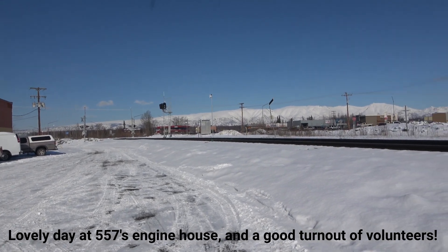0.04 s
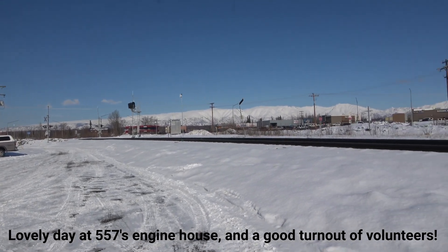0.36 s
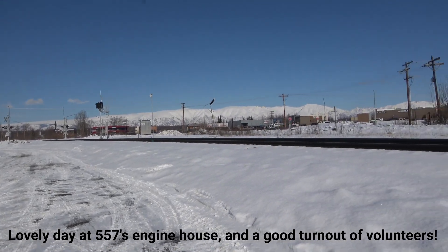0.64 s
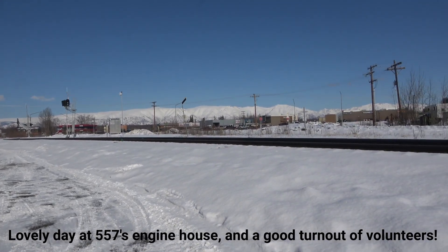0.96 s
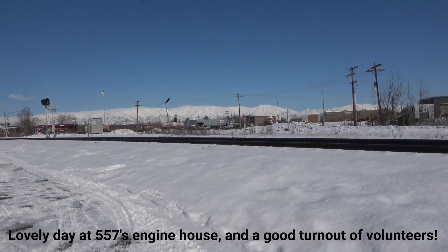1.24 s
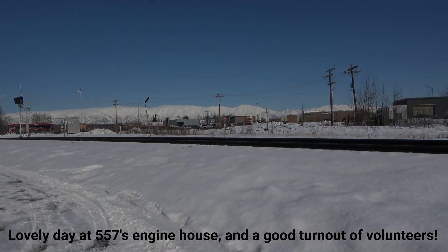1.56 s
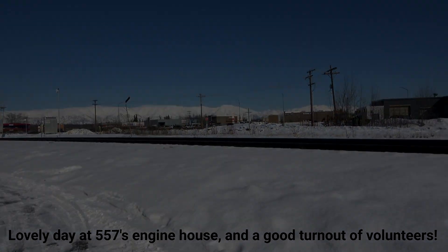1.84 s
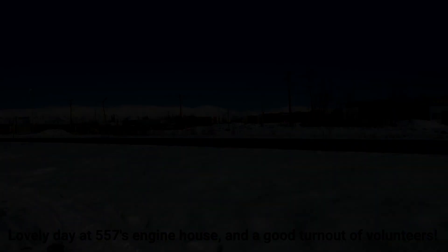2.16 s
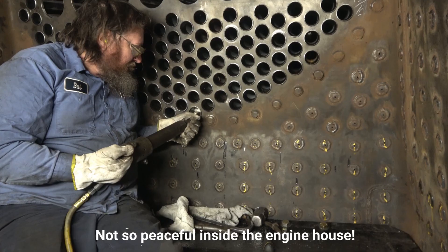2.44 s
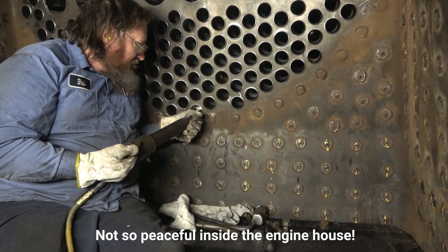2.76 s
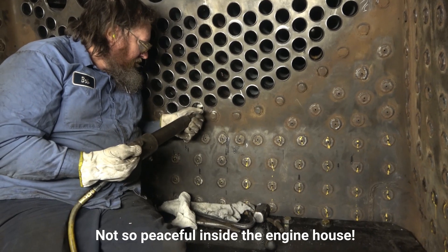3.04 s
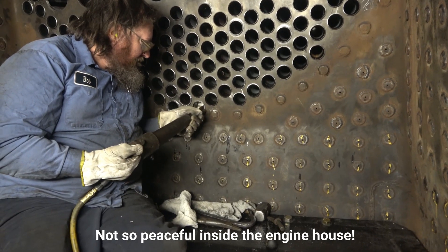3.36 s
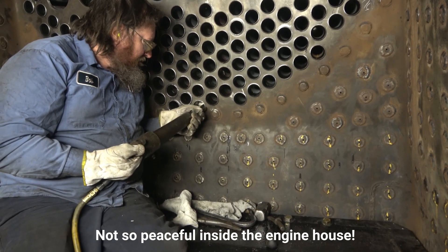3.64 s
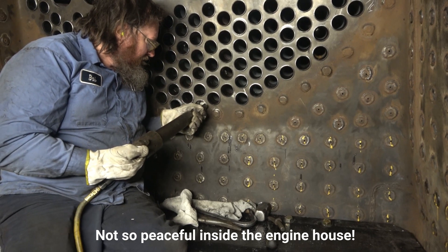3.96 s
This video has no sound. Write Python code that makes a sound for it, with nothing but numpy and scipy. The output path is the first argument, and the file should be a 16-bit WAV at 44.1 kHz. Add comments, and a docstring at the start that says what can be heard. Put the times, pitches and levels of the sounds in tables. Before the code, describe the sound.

An air hammer on steel dominates, after a quiet outdoor opening. Distant traffic hums and hisses over low wind, with a soft bump near 0.2 seconds, fading from 1.5 seconds to near silence. At 2.4 seconds the hammer cuts in, loud and close, about seventeen blows a second. The metal chamber rings in a steady, rasping din until 4 seconds, with a few high pings near the end.

```python
"""Distant traffic, then an air hammer in a firebox.

Far traffic hums and hisses over a low wind rumble, then fades. Cut to the inside of a steel firebox:
an air hammer strikes a boiler tube about 17 times a second. Every blow cracks, rings the tool bit
and feeds the plates and the chamber, whose ringing piles up into a steady din."""
import sys
import numpy as np
from scipy import signal
from scipy.fft import rfft, irfft, next_fast_len
from scipy.io import wavfile
from scipy.ndimage import uniform_filter1d, map_coordinates

SR = 44100
rng = np.random.default_rng(int(sys.argv[2]) if len(sys.argv) > 2 else 0)


def wav_record(signal):
    """Record a signal, one row per channel, as 16-bit PCM in the file named by sys.argv[1]."""
    frames = np.transpose(np.atleast_2d(signal))
    bounded = np.clip(frames, -1, 1)
    # unit amplitude maps onto the largest positive 16-bit level
    quanta = np.round(bounded * 32767).astype(np.int16)
    wavfile.write(sys.argv[1], SR, quanta)


N = 176400
TIME_S = np.arange(N) / SR
CUT_S = 2.396
BLOW_PERIOD_S, BOUNCE_S = 0.057, 0.02


def amp(db):
    return 10 ** (np.asarray(db) / 20)


def unit_rms(x):
    return x / np.sqrt(np.mean(x ** 2) + 1e-20)


def unit_inside(pair):
    """Each signal at rms 1 over the time after the cut."""
    return pair / np.std(pair[:, round(CUT_S * SR):], axis=1, keepdims=True)


def curves(rows):
    """One value per sample for each column after the time."""
    times_s, *columns = np.transpose(rows)
    return [np.interp(TIME_S, times_s, column) for column in columns]


def wobble(rate_hz):
    """Smooth random curve, rate_hz knots a second."""
    knots = rng.standard_normal(int(N * rate_hz / SR) + 4)
    return map_coordinates(knots, [TIME_S * rate_hz])


def filtered(x, response):
    """x through a gain given as a function of Hz."""
    size = next_fast_len(N + SR // 2)
    return irfft(rfft(x, size) * response(np.fft.rfftfreq(size, 1 / SR)), size)[..., :N]


def coloured(x, spectrum):
    """x shaped by (Hz, dB) points."""
    points_hz, db = np.transpose(spectrum)
    return filtered(x, lambda hz: amp(np.interp(np.log(hz + 1), np.log(points_hz + 1), db)))


def rolled_off(pair, edge_hz, db_per_octave):
    """Low-pass with a moving edge."""
    hz, frame_s, bins = signal.stft(pair, SR, nperseg=256)
    octaves = np.log2(np.maximum(hz[:, None] / np.interp(frame_s, TIME_S, edge_hz), 1))
    return signal.istft(bins * amp(-db_per_octave * octaves), SR, nperseg=256)[1][:, :N]


def stereo(pair, side_db):
    """Mid and side to left and right."""
    return pair[0] + amp(side_db) * np.array([pair[1], -pair[1]])


def decay(t60_s):
    return amp(-60 * np.arange(SR) / SR / t60_s)


def ring(drive, responses):
    return signal.fftconvolve(drive[None], responses, axes=1)[:, :N]


def bursts(impulses, t60_s):
    """A noise pair dying away after every impulse."""
    energy = ring(impulses ** 2, decay(t60_s)[None] ** 2)
    return np.sqrt(np.abs(energy)) * rng.standard_normal((2, N))


def rush(spectrum, side_db, flutter_db):
    """Stereo noise with a restless level."""
    noise = coloured(rng.standard_normal((2, N)), spectrum)
    return unit_rms(stereo(noise, side_db)) * amp(flutter_db * wobble(12.52))


# Wind rumble (frequency [Hz], density [dB])
WIND_SPECTRUM = [(11, -31), (20, -1), (81, -0.5), (100, -9), (160, -11), (300, -23), (420, -62)]

def wind():
    """Low, unsteady wind rumble."""
    return amp(-29) * rush(WIND_SPECTRUM, side_db=-18, flutter_db=2)


# Road noise and tyre hiss (frequency [Hz], density [dB])
ROAD_SPECTRUM = [(150, -30), (250, -7.5), (750, -3.5), (1660, -10.5), (2840, -18.5), (4770, -28.5),
                 (6300, -40), (9070, -38.5), (15800, -52.5)]
TYRE_SPECTRUM = [(1000, -10), (2300, 0), (3300, -4.5), (5500, -18), (8000, -26), (11000, -44)]
# Tyre hiss (time [s], level [dB])
TYRE_LEVEL = [(0, -49), (.3, -50), (.5, -45.5), (.8, -47.5), (.95, -55.5), (1.45, -58), (1.75, -47.5)]

def traffic():
    """A far road with swelling tyre hiss."""
    road = amp(-38) * rush(ROAD_SPECTRUM, side_db=-6.5, flutter_db=0.67)
    tyres = amp(curves(TYRE_LEVEL)[0]) * rush(TYRE_SPECTRUM, side_db=-6.5, flutter_db=2.3)
    return road + tyres


# Far engine (time [s], level [dB])
ENGINE_LEVEL = [(0, -36.5), (.5, -36), (.58, -27.5), (.8, -31), (1.05, -32), (1.25, -32.5), (1.48, -35)]

def engine(pitch_hz=83.4, wander=0.0275):
    """A wandering drone with a weak octave."""
    phase = 2 * np.pi * np.cumsum(pitch_hz * (1 + wander * wobble(14.0))) / SR
    drone = unit_rms(np.sin(phase) + amp(-15.5) * np.sin(2 * phase))
    return drone * amp(curves(ENGINE_LEVEL)[0] + 0.91 * wobble(15.9))


def chirp(centre_s=0.033, width_s=0.012, pitch_hz=3480):
    """One faint, far chirp."""
    t = TIME_S - centre_s
    return amp(-46) * np.exp(-(t / width_s) ** 2) * np.sin(2 * np.pi * pitch_hz * t)


# Soft bumps (time [s], level [dB])
BUMPS = [(.24, -17.5), (1.817, -32.5), (3.689, -11.5)]

def bumps(pitch_hz=355, rise_s=0.0016, t60_s=0.022):
    """Dull, quickly damped knocks."""
    onset_s, db = np.transpose(BUMPS)
    age_s = np.maximum(TIME_S - onset_s[:, None], 0)
    envelope = (1 - np.exp(-age_s / rise_s)) * amp(-60 * age_s / t60_s)
    return amp(db) @ (envelope * np.sin(2 * np.pi * pitch_hz * age_s))


# Workshop rumble (time [s], level [dB])
WORKSHOP_LEVEL = [(2.25, -89), (2.38, -82), (2.41, -39), (2.65, -39), (2.76, -44.5), (4, -42)]
# Workshop rumble (frequency [Hz], density [dB])
WORKSHOP_SPECTRUM = [(18, -25), (45, 3.5), (70, -12), (120, -1), (190, -6.5), (400, -39)]

def workshop():
    """Low room rumble, rising at the cut."""
    return amp(curves(WORKSHOP_LEVEL)[0]) * rush(WORKSHOP_SPECTRUM, side_db=-61.5, flutter_db=1.0)


def echoes(strokes, rattle, spectrum, t60_s, standing_share, wall_t60_s=0.3):
    """Scattered echoes of the strokes, plus close standing modes rung by the rattle."""
    standing = unit_inside(ring(rattle, decay(wall_t60_s) * rng.standard_normal((2, SR))))
    scattered = unit_inside(bursts(strokes, t60_s))
    blend = np.sqrt(1 - standing_share) * scattered + np.sqrt(standing_share) * standing
    return unit_inside(coloured(blend, spectrum))


# Chamber din, rasp and steel-on-steel crack (frequency [Hz], density [dB])
CHAMBER_SPECTRUM = [(53, -54), (90, -23.5), (183, -12), (590, -8), (950, -3), (1900, -3), (2500, -3),
                    (3100, -8.5), (4030, -20), (6820, -120)]
RASP_SPECTRUM = [(2300, -36), (3100, 7), (3600, 4.5), (4500, 4.5), (5600, -4.5)]
CRACK_SPECTRUM = [(3000, -8.5), (5700, 1.5), (6670, -1.5), (8750, -6), (11300, -9.5), (12400, -13.5),
                  (15200, -18), (15800, -37)]
# Rasp of the bit on the tube (time [s], level [dB], upper edge [Hz])
RASP_TRACK = [(2.42, -30, 4380), (2.72, -26, 4040), (2.92, -22.5, 5070), (3.2, -21.5, 5460),
              (3.5, -19.5, 5600), (3.72, -23.5, 4870), (4, -25, 5100)]
# Treble echoes of the crack (time [s], level [dB])
TREBLE_LEVEL = [(2.42, -34), (2.9, -33.5), (3.8, -32.5), (3.92, -27), (4, -32.5)]

def firebox(strokes):
    """Piston strokes fill the chamber with echoes; the rasp brightens as the bit bites."""
    rattle = bursts(strokes, t60_s=0.13)[0]
    din = echoes(strokes, rattle, CHAMBER_SPECTRUM, t60_s=0.65, standing_share=0.1)
    rasp_db, edge_hz = curves(RASP_TRACK)
    rasp = echoes(strokes, rattle, RASP_SPECTRUM, t60_s=0.8, standing_share=0.45)
    rasp = rolled_off(rasp, edge_hz, db_per_octave=90)
    treble_db = curves(TREBLE_LEVEL)[0] + 1.5 * wobble(300)  # flickers with small ticks
    treble = echoes(strokes, rattle, CRACK_SPECTRUM, t60_s=0.98, standing_share=0.45)
    return amp(-17.5) * din + amp(rasp_db + 1) * rasp + amp(treble_db + 2) * treble


# Steel plate modes (frequency [Hz], level [dB])
PLATE_MODES = [(336, -37), (420, -35.5), (510, -36.5), (641, -29), (683, -37), (715, -32), (817, -30.5),
               (855, -30), (925, -30.5), (974, -29.5), (1064, -28.5), (1095, -31), (1135, -33.5),
               (1305, -37.5), (1458, -28), (1477, -24), (1495, -26), (1655, -33), (1720, -28),
               (1735, -27.5), (1779, -27), (1910, -29.5), (1932, -27.5), (1994, -29.5), (2060, -31.5),
               (2137, -27.5), (2221, -32), (2260, -33.5), (2336, -31.5), (2360, -33.5), (2611, -31.5),
               (2765, -35), (2832, -28), (3120, -34.5), (3250, -37), (3371, -31.5), (3540, -36.5),
               (3606, -35.5), (3810, -38), (3870, -37.5), (4030, -41)]

def plates(blow_times_s, coherence_t60_s=0.82, swing_db=1.88):
    """The modes never die between blows; each blow shifts their phase and strength."""
    start = round(CUT_S * SR)
    t = TIME_S[start:]
    blow_index = np.searchsorted(np.sort(blow_times_s), t)
    kick_rad = np.sqrt(2 * np.log(1000) * BLOW_PERIOD_S / coherence_t60_s)
    out = np.zeros((2, N))
    for hz, db in PLATE_MODES:
        kick, swing = rng.standard_normal((2, 2, len(blow_times_s) + 1))
        phase = kick_rad * np.cumsum(kick, axis=1) + 2 * np.pi * rng.random((2, 1))
        phasors = amp(db + swing_db * swing) * np.exp(1j * phase)
        smoothed = uniform_filter1d(phasors[:, blow_index], int(BOUNCE_S * SR))
        out[:, start:] += (smoothed * np.exp(2j * np.pi * hz * t)).real
    return out


# Pings of the bit (time [s], frequency [Hz], peak [dB])
BIT_PINGS = [(2.444, 11900, -37), (3.445, 11900, -35), (3.793, 12200, -34), (3.904, 6860, -22),
             (3.904, 9350, -31), (3.904, 12000, -29), (3.959, 5950, -24)]

def pings(t60_s=0.21):
    """Now and then the bit rings out clearly."""
    out = np.zeros(N)
    for onset_s, hz, db in BIT_PINGS:
        age_s = np.maximum(TIME_S - onset_s, 0)
        envelope = amp(db - 60 * age_s / t60_s) * (age_s > 0)
        out += envelope * np.sin(2 * np.pi * hz * age_s + wobble(250))
    return out


# Tool bit modes (frequency [Hz], bandwidth [Hz], gain [dB])
BIT_MODES = [(6700, 150, 0), (9700, 250, -12), (12000, 255, -1)]

def bit_ring(hits, force_exponent=2.5):
    """Bright resonances of the bit; hard blows ring it far more than soft ones."""
    def response(hz):
        return sum(amp(db) * 1j * hz * width_hz / (mode_hz ** 2 - hz ** 2 + 1j * hz * width_hz)
                   for mode_hz, width_hz, db in BIT_MODES)

    return unit_inside(filtered(bursts(hits ** force_exponent, t60_s=0.089), response))


def crack(hits):
    """Steel on steel: a short, bright burst per hit."""
    return unit_inside(coloured(bursts(hits, t60_s=0.075), CRACK_SPECTRUM))


def strikes(blows, bounce_db=-4.5):
    """An impulse for each blow and for the bounce of the bit after it."""
    out = np.zeros(N + SR)
    for (onset_s, db), scatter in zip(blows, rng.normal(0, 0.12, len(blows))):
        bounce_at_s = onset_s + BOUNCE_S * (1 + scatter)
        out[round(onset_s * SR)] += amp(db)
        out[round(bounce_at_s * SR)] += amp(db + bounce_db)
    return out[:N]


def piston_strokes(blow_times_s, contact_s=0.0044):
    """Equal-strength strokes spread over the contact time, already under way at the cut."""
    lead_in_s = [blow_times_s[0] - BLOW_PERIOD_S * k for k in range(1, 10)]
    impulses = strikes([(s, 0) for s in lead_in_s + blow_times_s])
    energy = uniform_filter1d(impulses ** 2, int(contact_s * SR))
    return np.sqrt(np.abs(energy))


# Hammer blows (time [s], level [dB])
HAMMER_BLOWS = [(2.4123, -22), (2.443, -19), (2.496, -21.5), (2.53, -22), (2.587, -21), (2.652, -23.5),
                (2.7197, -22.5), (2.785, -25), (2.8486, -34), (2.911, -22), (2.972, -26), (3.028, -23),
                (3.0923, -21), (3.1457, -23.5), (3.21, -36), (3.27, -22), (3.33, -25), (3.385, -20.5),
                (3.443, -23.5), (3.5005, -19), (3.557, -19.5), (3.6145, -19), (3.6728, -21), (3.731, -18.5),
                (3.793, -20), (3.848, -21), (3.905, -33), (3.9597, -19)]

def air_hammer(pan_db=0.26):
    """Each blow drives the chamber and the plates, rings the bit and cracks on the tube."""
    times_s = [s for s, _ in HAMMER_BLOWS]
    mean_db = np.mean([db for _, db in HAMMER_BLOWS])
    ringing = firebox(piston_strokes(times_s)) + plates(times_s)
    hits = strikes(HAMMER_BLOWS)
    tool = amp(mean_db - 22) * bit_ring(hits) + amp(mean_db - 15) * crack(hits)
    return stereo(ringing + tool, side_db=-10.5) * amp([[pan_db], [-pan_db]]) + pings()


def scene(fade_start_s=1.44, fade_db_per_s=64.5):
    """The open air fades out, then a hard cut into the firebox."""
    hammer = air_hammer()
    rumble = workshop()
    fade = amp(-fade_db_per_s * np.maximum(TIME_S - fade_start_s, 0))
    outdoors = fade * (wind() + traffic() + engine() + chirp())
    return np.where(TIME_S >= CUT_S, hammer, outdoors) + bumps() + rumble


def record(dry, limit_db=-12.5, window_s=0.013, top_hz=15780):
    """An rms limiter holds the din level; a brick-wall low-pass follows."""
    power = uniform_filter1d(np.mean(dry ** 2, axis=0), int(window_s * SR))
    reduction = np.maximum(1, np.sqrt(np.abs(power)) / amp(limit_db))
    return filtered(dry / reduction, lambda hz: hz < top_hz)


dry = scene()
out = record(dry)
wav_record(out)
```